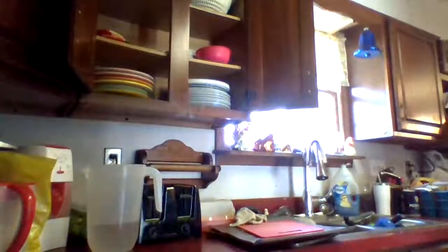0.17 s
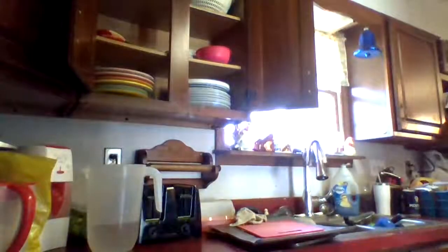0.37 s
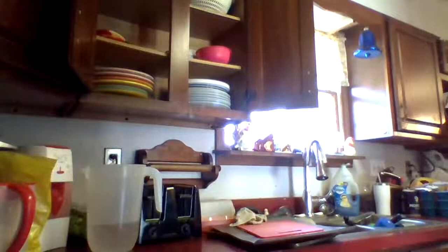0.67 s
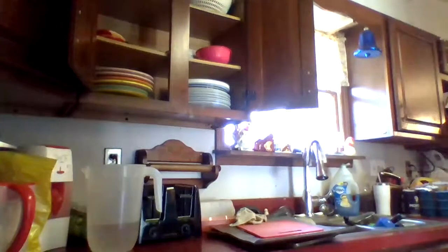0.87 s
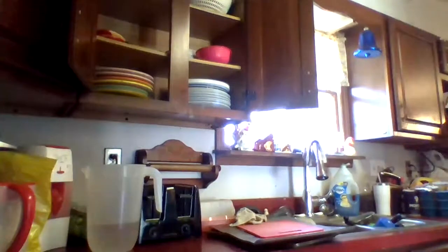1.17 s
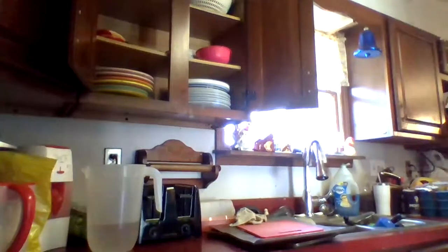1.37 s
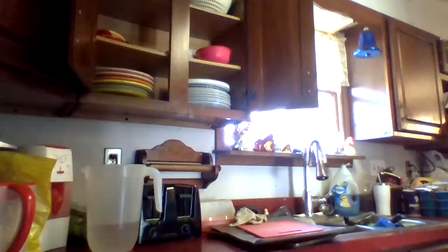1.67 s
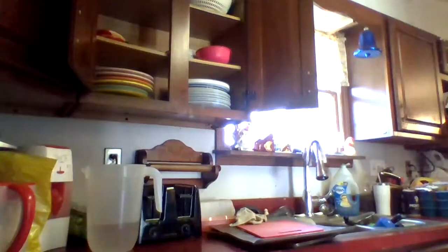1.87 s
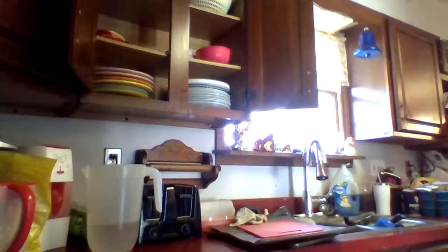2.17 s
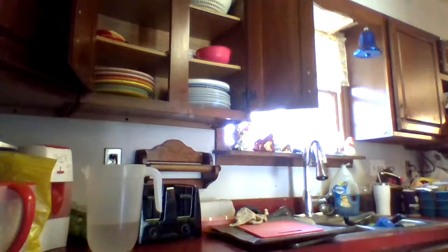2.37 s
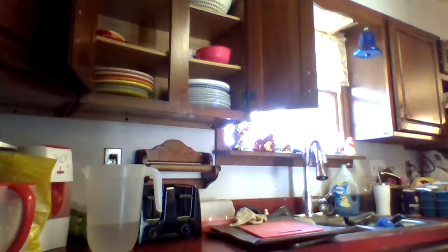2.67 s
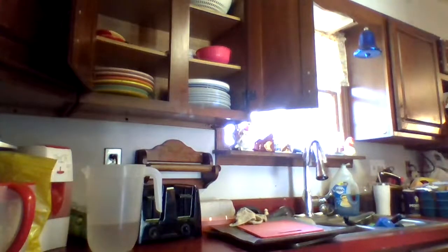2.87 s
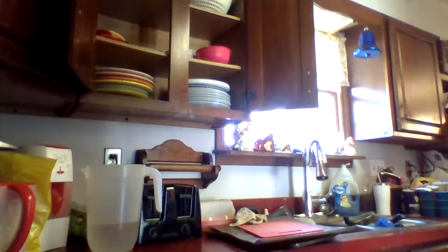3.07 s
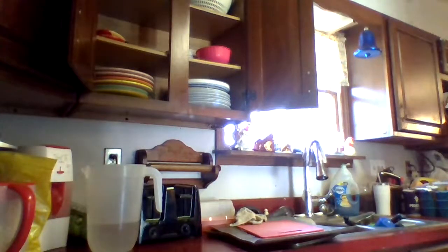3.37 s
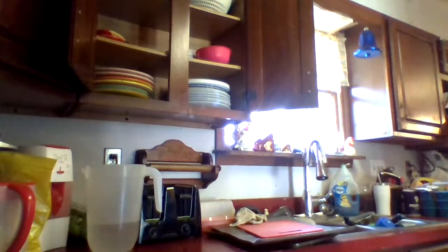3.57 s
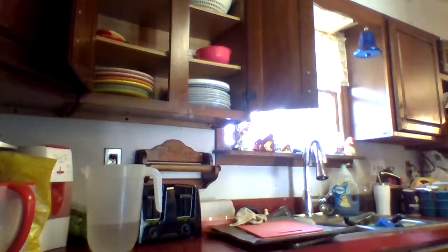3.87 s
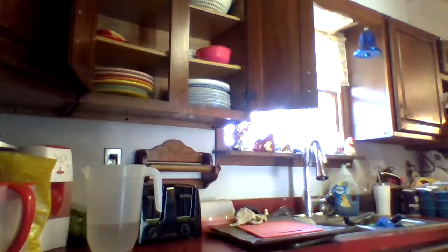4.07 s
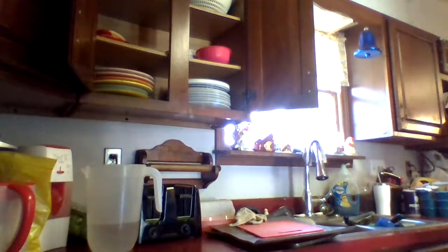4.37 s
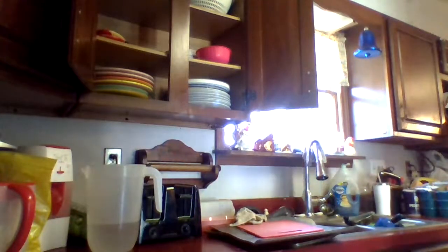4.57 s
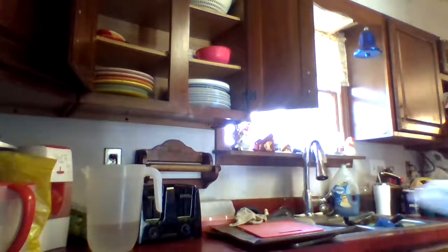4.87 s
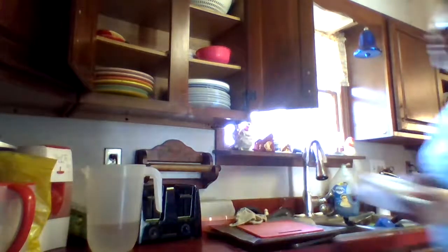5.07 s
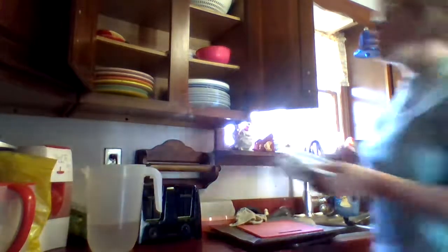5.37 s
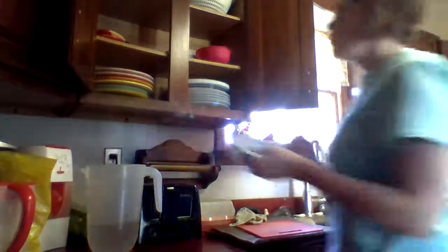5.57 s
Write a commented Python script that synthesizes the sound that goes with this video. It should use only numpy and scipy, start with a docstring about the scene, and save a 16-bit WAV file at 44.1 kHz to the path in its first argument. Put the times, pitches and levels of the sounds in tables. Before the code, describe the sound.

In a small lively kitchen, ceramic plates are lifted from a rack and gathered a few steps from the microphone. Two early clinks lead to a loud rapid clatter, then scattered lighter taps and further clashes. Grainy sliding and low footfall thuds follow, ending in a hard, distorted clack. A faint refrigerator hum and hiss lie beneath; sound is only in the left channel.

```python
"""In a small kitchen, a few steps from the microphone, ceramic plates are lifted from a rack and gathered.
Rims clash and chatter: each contact is a noise crack plus plate modes rung by a burst of tiny blows.
Glaze slides as grainy hiss and brushed rims sing single tones, over low footfall thuds,
a refrigerator's wavering tones and shaped noise for room rumble and microphone hiss.
Only the left channel carries sound; the hardest blows clip."""
import sys
import numpy as np
from scipy import signal
from scipy.fft import rfft, irfft, next_fast_len
from scipy.io import wavfile
from scipy.ndimage import map_coordinates

SR = 44100
rng = np.random.default_rng(int(sys.argv[2]) if len(sys.argv) > 2 else 0)


def transcribe(signal):
    """Save signal, clipped to [-1, 1], as a 16-bit WAV file at the path in sys.argv[1]."""
    frames = np.atleast_2d(signal).T
    limited = np.clip(frames, -1, 1)
    pcm = np.round(limited * 32767).astype(np.int16)
    wavfile.write(sys.argv[1], SR, pcm)


N = 251811  # length in samples


def amp(db):
    """Amplitude factor of a level in dB."""
    return 10 ** (np.asarray(db) / 20)


def unit(x):
    """The signal scaled to an rms of 1."""
    return x / np.sqrt(np.mean(x ** 2) + 1e-20)


def along(points, hz):
    """Values at hz, read from (f/Hz, value) points on a log frequency axis."""
    f, value = np.transpose(points)
    return np.interp(np.log(hz + 1), np.log(f + 1), value)


def wobble(rate):
    """A smooth random curve with rate knots a second."""
    knots = rng.standard_normal(int(N * rate / SR) + 4)
    return map_coordinates(knots, [np.arange(N) * rate / SR])


def noise(spectrum, size):
    """Noise whose relative level per Hz follows (f/Hz, level/dB) points."""
    hz = np.fft.rfftfreq(size, 1 / SR)
    white = rfft(rng.standard_normal(size))
    return irfft(white * amp(along(spectrum, hz)), size)


def air():
    """Room rumble and microphone hiss: steady noise whose level drifts slightly."""
    # colour of the quiet room and microphone: f/Hz, relative level per Hz/dB
    room_colour = [(15, -3), (30, -3), (60, -3.5), (80, -18), (140, -18.5), (250, -21.5), (380, -19.5),
                   (480, -27), (1000, -30.5), (2750, -41), (8000, -44), (11000, -45.5), (14000, -39.5),
                   (16500, -45)]
    level_db = -49.5 + 0.23 * wobble(0.83)
    return amp(level_db) * unit(noise(room_colour, N))


def fridge():
    """Refrigerator tones, each wavering in level while all share a slow wander in pitch."""
    # refrigerator tones, a 56.5 Hz harmonic series and a separate 380 Hz tone: f/Hz, nominal rms level/dB
    hum_tones = [(56.5, -58.5), (113, -65), (169.5, -51), (226, -63), (282.5, -70), (380, -69.5)]
    t = np.arange(N) / SR
    drift = np.cumsum(0.004 * wobble(2.7)) / SR  # s
    out = np.zeros(N)
    for hz, db in hum_tones:
        level = np.sqrt(2) * amp(db + wobble(18))
        phase = rng.uniform(0, 2 * np.pi)
        out += level * np.sin(2 * np.pi * hz * (t + drift) + phase)
    return out


def steps():
    """Footfalls felt through the counter: the floor's slow mode swells and dies."""
    # footfalls: t/s, level before the swell/dB, f/Hz, t60/s
    footfalls = [(4.365, -22.5, 27.9, 0.53), (4.431, -35, 35.6, 0.18), (4.539, -46.5, 39.84, 0.14),
                 (5, -32.5, 41.4, 0.11), (5.071, -15, 28.5, 0.15), (5.141, -32.5, 31.1, 0.64)]
    out, t = np.zeros(N + SR), np.arange(SR // 2) / SR
    swell = 1 - np.exp(-t / 0.0126)
    for s, db, hz, t60 in footfalls:
        thud = amp(db - 60 * t / t60) * np.sin(2 * np.pi * hz * t) * swell
        out[round(s * SR):][:len(t)] += thud
    return out[:N]


def room_tail():
    """A fresh kitchen echo tail of energy 1; each frequency dies at its own speed."""
    # how long the kitchen rings: f/Hz, t60/s
    kitchen_t60 = [(200, 0.16), (1000, 0.46), (4000, 0.38), (9000, 0.31), (15000, 0.2)]
    hz, t, z = signal.stft(rng.standard_normal(SR // 2), SR, nperseg=256)
    decay = amp(-60 * t / along(kitchen_t60, hz)[:, None])
    tail = signal.istft(z * decay, SR, nperseg=256)[1]
    tail = tail * (1 - np.exp(-np.arange(len(tail)) / (0.0005 * SR)))  # echoes thicken over the first walls
    return tail / np.linalg.norm(tail)


def slides():
    """Glaze on glaze: hiss, grainy where it catches, swells to a peak, fades, and echoes in the room."""
    # strokes: peak t/s, 20 dB rise/s, 20 dB fall/s, dull level/dB, bright level/dB (before the echo)
    strokes = [(.02, 0.13, .25, -62, -66), (.165, 0.054, .01, -51.5, -60.5),
               (3.956, 0.023, .03, -61.5, -87), (4.15, 0.39, 0.19, -59, -52),
               (4.873, .015, 0.092, -42.5, -67), (5.149, .25, 0.087, -58.5, -66.5),
               (5.286, .055, .01, -50.5, -55), (5.62, 0.25, .3, -61.5, -70)]
    # colour of the dull hiss: f/Hz, relative level per Hz/dB
    dull_colour = [(500, -11), (1200, -6), (2500, -7.5), (4500, -9.5), (8000, -24)]
    # colour of the bright hiss: f/Hz, relative level per Hz/dB
    bright_colour = [(2500, -24), (5000, 1.5), (8000, 0), (12000, -4.5), (16000, -9.5)]
    out, t = np.zeros(N), np.arange(N) / SR
    dull = unit(noise(dull_colour, N) * amp(2.5 * wobble(230)))
    bright = unit(noise(bright_colour, N) * amp(2.5 * wobble(230)))
    for s, rise, fall, dull_db, bright_db in strokes:
        swell = amp(-20 * np.maximum((s - t) / rise, (t - s) / fall))
        out += swell * (amp(dull_db) * dull + amp(bright_db) * bright)
    echo = signal.fftconvolve(out, room_tail())[:N]
    return out + amp(-1.0) * echo


def brushes():
    """Rims brushed so softly that one mode alone sings, swelling gently and fluttering as it fades."""
    # brushed rims: t/s, f/Hz, level before swell and flutter/dB, t60/s
    brushed = [(0.136, 3100, -49, 0.17), (.45, 1976, -51, 0.11), (.455, 3440, -53.5, 0.09),
               (.6, 1976, -60, 0.11), (.91, 1976, -58, 0.26), (.92, 3440, -65, .15),
               (.995, 2100, -55, 0.13), (4.555, 5860, -60.5, 0.22), (4.699, 2150, -60.5, 0.2),
               (5.601, 3880, -65, 0.5)]
    out, t = np.zeros(N + SR), np.arange(SR // 2) / SR
    swell = 1 - np.exp(-t / 0.0054)
    for s, hz, db, t60 in brushed:
        tone = amp(db - 60 * t / t60) * np.sin(2 * np.pi * hz * t) * swell
        out[round(s * SR):][:len(t)] += tone
    flutter = amp(3 * wobble(60))
    return out[:N] * flutter


def plate_ring(modes, grip, t):
    """The plates' modes, one a row; hand and neighbours damp them, the high ones first."""
    hz, level_db, t60 = np.transpose(modes)[:, :, None]
    chance = rng.standard_normal((3, len(modes), 1))  # for level, phase and beat rate
    own_loss_db = 60 * t / np.clip(t60, 0.02, 2)
    grip_loss_db = 60 * t * (1 + hz / 9000) / grip
    # a round plate's modes come in close pairs, so they beat
    beat = np.cos(2 * np.pi * 0.0022 * hz * chance[2] * t + chance[1])
    tone = np.sin(2 * np.pi * hz * t + 3 * chance[1]) * (1 + 0.7 * beat)
    return amp(level_db + 0.64 * chance[0] - own_loss_db - grip_loss_db) * tone


def clink(modes, knock_db, body_db, sparkle_db, ring_db, chatter, grip):
    """A burst of tiny rim contacts: a lumpy noise crack, and blows that ring the plates."""
    # where knock (two points), body, clink and sparkle (two points) sit: f/Hz
    bands = [150, 450, 1200, 4000, 11000, 16000]
    t = np.arange(SR // 6) / SR
    ring = plate_ring(modes, grip, t)
    dying = amp(-60 * t / chatter) * (1 - np.exp(-t / 0.0034))
    touches = rng.random(len(t)) < 900 / SR  # about 900 re-contacts a second
    taps = dying * rng.standard_normal(len(t)) * touches
    taps[0] = 0.8  # the first blow

    # knock is weaker at its low edge, sparkle stronger at its low edge
    band_db = [knock_db - 3.5, knock_db, body_db, 0, sparkle_db + 5.5, sparkle_db]
    knots = t[::90]
    grain = amp(2.5 * np.interp(t, knots, rng.standard_normal(len(knots))))  # the crack comes in lumps
    crack = noise(list(zip(bands, band_db)), len(t)) * dying * grain

    tones, blows = rfft(ring, 2 ** 13), rfft(taps, 2 ** 13)
    # each mode keeps its own energy, however the blows happen to fall
    share = np.linalg.norm(tones, axis=1) / np.linalg.norm(tones * blows, axis=1)
    rung = irfft(share @ tones * blows)[:len(t)]
    rung = rung * (1 - np.exp(-t / 0.00062))  # soft onset
    return crack + amp(ring_db) * rung


def plates():
    """Every rim contact, direct and answered by the kitchen; the pair that touches sets its modes."""
    # contacts: t/s, level/dB (gain on crack and ring), ring gain over crack/dB, chatter t60/s
    contacts = [(.1745, -17, -11, 0.085), (.2079, -21.5, -1, 0.067), (0.6293, -55, -11.5, .03),
                (.9994, -52.5, -2, .041), (1.0355, -12, -6.5, .029), (1.3914, -15.5, 6, 0.24),
                (1.3987, -6, -4, 0.062), (1.4194, -15.5, -30, .059), (1.4676, -2, -5.5, 0.063),
                (1.4944, -10, -5.5, 0.06), (1.5144, -10.5, -13, 0.047), (1.5392, -19, -28, 0.034),
                (1.6422, -12.5, -11, 0.052), (1.6687, -23.5, -26, 0.09), (1.7391, -33.5, -7, 0.055),
                (1.8856, -29.5, -1.5, 0.051), (1.92, -34.5, -4, 0.069), (1.9445, -27.5, -6.5, 0.0355),
                (2.0038, -32, -4.5, 0.085), (2.0921, -34, -12, .068), (2.1294, -37, -12.5, 0.057),
                (2.1814, -30, -14, 0.06), (2.2628, -21.5, 8, 0.053), (2.4833, -47, -6, 0.067),
                (2.6105, -10.5, -15, 0.1), (2.6394, -15.5, -15.5, 0.052), (2.7324, -30, -9.5, 0.044),
                (2.7874, -15.5, -3, 0.074), (2.8194, -18, -7.5, .06), (2.843, -23, -6, .06),
                (2.9317, -11, 3.5, 0.031), (3.034, -36, -14, .04), (3.2884, -59, 2.5, 0.033),
                (3.4526, -32.5, -9.5, 0.0376), (3.5094, -35.5, 6, 0.088), (3.5504, -22.5, -7, 0.055),
                (3.5568, -14, -7.5, 0.0297), (3.8841, -33.5, -2, 0.049), (3.9504, -43.5, -19, 0.096),
                (4.0003, -45, -17, 0.064), (4.2532, -11.5, -12, 0.07), (4.336, -12.5, -18.5, 0.0384),
                (4.7788, -29, -7.5, 0.081), (5.2906, -1.5, -15, 0.13), (5.2952, -12, 16, .037),
                (5.2996, -21, 16, 0.028), (5.305, -16, 10, .025), (5.3235, -20.5, -13, 0.067)]
    # which plates touch: from t/s, number of the pair
    touching = [(0, 15), (.4, 0), (1.38, 1), (1.63, 2), (1.87, 11), (2.08, 3), (2.17, 11), (2.25, 4),
                (2.59, 5), (2.78, 6), (2.92, 7), (3.4, 12), (3.5, 13), (3.545, 8), (3.8, 16), (4.2, 9),
                (4.75, 14), (5.2, 10)]
    # modes of each pair: f/Hz, level/dB (nominal), t60/s (held within 0.02-2 s, before the grip)
    pair_modes = [
        [(1975, -12, 0.58), (2390, -16.5, 0.27), (3380, -8.5, 0.47), (5180, -19.5, 5.0), (6000, -1, 0.31),
         (6767, -15, 0.73), (6960, -18, 0.29), (7670, -12.5, 0.41), (8393, -17, 0.33), (9300, -16, 0.26),
         (10060, -22.5, 0.18), (12190, -25, 0.26), (12890, -29, 0.78), (14300, -29.5, 0.28)],
        [(1267, -15.5, 0.2), (2030, -15, 0.48), (3140, -9, 0.2), (3460, -8, 0.7), (4266, -10, 0.6),
         (4880, -17.5, 2.7), (5520, -11, 0.25), (5590, -15.5, 0.88), (5980, -10.5, 1.5), (6726, -6.5, 1.1),
         (6360, -9, 1.6), (6865, -5, 1.4), (8250, -9, 0.78), (9320, -18.5, 5.0), (9300, -24.5, 0.74),
         (9570, -11, 0.8), (10100, -19, 0.53), (10770, -13, 0.67), (13150, -6.5, 0.33), (12000, -12.5, 0.45),
         (13350, -6, 0.87), (12160, -17.5, 0.5)],
        [(1070, -7, 0.81), (2060, -5, 0.26), (3100, -14.5, 0.097), (3610, -4, 0.21), (4250, -14, 0.23),
         (6660, -4, 0.1), (7940, -17, 0.17), (8301, -10, 0.28), (8950, -8.5, 0.38), (10730, -28.5, 0.29),
         (12500, -37, 0.24), (12900, -11, 0.24)],
        [(2450, 6, 0.037), (3520, -2.5, 0.09), (4960, -9.5, 5.0), (5760, -5, 5.0), (7460, -2.5, 0.79),
         (8600, 0.5, 0.51), (9760, 2.5, 0.22), (11000, -2, 0.39), (11500, -19, 0.76), (13410, -6.5, 5.0),
         (14100, -7, 0.39), (15460, -16.5, 5.0)],
        [(1190, -18.5, 0.34), (2003, -18, 0.44), (2600, -16, 0.35), (3516, -7, 0.53), (4320, -12.5, 0.19),
         (4840, -9, 0.84), (5510, -8, 0.65), (6505, -8.5, 0.26), (6880, -5.5, 0.42), (7970, -17, 0.087),
         (8650, -19, 0.49), (9690, -19.5, 0.228), (10670, -22, 0.16), (14840, -45, 0.37)],
        [(1962, -4, 5.0), (3984, -5.5, 0.15), (3194, 0, 0.35), (3445, -5, 0.3), (5693, 1.5, 0.27),
         (6750, -2, 0.17), (7100, -6.5, 0.21), (7800, -5.5, 0.3), (8350, -8.5, 1.4), (9440, -12, 0.24),
         (9510, -2, 0.14), (9870, -13, 0.24), (10900, -6, 0.24), (11450, -25, 0.2), (11900, -5.5, 0.17),
         (13290, 0, 0.25), (660, -20.5, 0.2), (1118, -6, 0.076)],
        [(1290, -9.5, 0.058), (1950, -5.5, 0.36), (2089, -9, 0.76), (2485, -13.5, 0.56), (3430, -9, 0.49),
         (4855, -7.5, 0.22), (6200, -10, 0.58), (6784, -3, 0.2), (7100, -15.5, 0.34), (8400, -8, 0.23),
         (10300, -5, 0.32), (13000, -22.5, 0.47), (14080, -26, 0.53), (14820, -14, 0.33)],
        [(1043, -16.5, 2.4), (2334, -21, 0.6), (3480, -16, 0.56), (4250, -17, 0.34), (5500, -43, 0.42),
         (6040, -23, 0.073), (6780, -15.5, 0.37), (9630, -26.5, 0.86), (11660, -23.5, 0.24), (13240, -18, 0.18),
         (13770, -33.5, 0.17)],
        [(2055, -6, 0.13), (2540, -10.5, 0.3), (2940, -9, 0.058), (3580, -14.5, 0.29), (4910, -9.5, 0.29),
         (5570, 4, 0.14), (5600, 1, 0.047), (6330, -10, 0.25), (6800, -11.5, 0.29), (7580, -13.5, 0.26),
         (7800, -28.5, 0.38), (8800, -12.5, 0.2), (10800, -25.5, 0.3), (12000, -32.5, 0.24),
         (13600, -26.5, 0.2), (306, -23.5, 0.2), (580, -31, 0.21)],
        [(1198, -10.5, 3.1), (2184, -11, 0.34), (2997, -8, 0.41), (3440, -19.5, 5.0), (4220, -8.5, 0.39),
         (4790, -25, 5.0), (6240, -17, 1.3), (5860, -25, 1.3), (6070, -24, 0.46), (7000, -17, 0.23),
         (8900, -25.5, 0.39), (10750, -10.5, 0.25), (11460, -49, 5.0), (13700, -27.5, 0.38)],
        [(774.6, -23.5, 0.31), (1236, -8.5, 0.074), (2593, -6, 0.15), (2765, -25.5, 0.34), (3020, -18, 0.21),
         (3933, -5.5, 0.02), (4277, -15.5, 0.085), (4747, -13.5, 0.1), (1391, -16, 0.13), (5450, -13, 0.1),
         (7090, -21.5, 0.087), (6720, -34.5, 0.85), (7130, -14.5, 0.14), (8200, -24.5, 0.15),
         (9160, -20.5, 0.18), (10800, -30.5, 0.23), (12000, -32, 0.096), (11740, -26, 0.14)],
        [(1090, -9, 5.0), (1560, -32.5, 0.15), (2169, -3.5, 0.095), (3393, -6.5, 0.5), (4560, -33, 5.0),
         (6160, -38.5, 5.0), (6930, -12.5, 0.14), (9800, -22, 0.24), (10960, -30.5, 5.0), (15500, -24, 1.2)],
        [(1140, 0.5, 0.067), (2020, -7.5, 0.053), (3400, -8, 0.78), (7350, -5, 0.03), (7860, -2.5, 0.12),
         (9430, -1, 0.1)],
        [(1013, -16, 0.22), (2210, -9, 0.015), (3596, -7, 0.027), (4770, -12.5, 0.16), (6089, -36, 0.096),
         (6934, -30, 0.027), (8565, -39, 0.096)],
        [(1155, -3, 5.0), (1876, -11, 0.064), (3440, -4, 0.21), (4320, -8, 0.13), (5480, -9, 0.19),
         (6730, -21.5, 0.3), (6870, -10, 0.13), (7650, -12, 0.19), (9600, -22.5, 0.061), (13340, -12, 0.13)],
        [(1130, -23.5, 2.1), (2060, -13, 0.18), (3443, -4.5, 0.28), (4160, -15, 0.24), (4850, -7.5, 0.32),
         (5920, -12, 0.3), (6783, -12.5, 0.67), (7120, -13, 0.22), (7460, -10.5, 0.18), (8650, -9, 0.2),
         (9600, -8, 0.15), (10100, -15.5, 0.19), (10830, -12, 0.23), (13360, -32.5, 0.35), (332, -19.5, 0.23),
         (743, -17, 0.1)],
        [(1370, -9, 0.1), (2510, -12.5, 0.6), (2760, -3, 0.06), (4530, -15, 0.13), (6400, -23, 5.0),
         (7946, -28.5, 0.39)],
    ]
    # how each pair is held and its distance: knock/dB, body/dB, sparkle/dB, grip t60/s (low modes), echo/dB
    holds = [(1, 3.5, -7, 0.098, 1), (-16, 2.5, -8.5, 0.098, 0.5), (-12.5, 2.5, -10, 0.136, -1.5),
             (-9, -1, -9.5, 0.046, 4), (-13, 3, -10.5, 0.033, -1.5), (-11, 4.5, -1.5, 0.124, -2.5),
             (-25, 1, -8.5, 0.095, 1), (-11, 4.5, -5.5, 0.048, 1.5), (5, -5.5, -11.5, 0.061, 1),
             (-17.5, -2, -17, 0.15, -3), (-20, -5, -14.5, 0.062, -10.5), (-8, 1.5, -9, 0.045, 1),
             (-11, -8, -7, 0.056, 0.5), (0, -3, -18, 0.1, -2), (-13, 2.5, -10, 0.092, -8.5),
             (-4.5, 3.5, -14.5, 0.091, -4), (-2.5, 8, -26.5, 0.043, -6.5)]
    out = np.zeros(N + 2 * SR)
    starts, pair = np.transpose(touching)
    for s, level_db, ring_db, chatter in contacts:
        k = int(pair[np.searchsorted(starts, s) - 1])
        knock_db, body_db, sparkle_db, grip, echo_db = holds[k]
        near = clink(pair_modes[k], knock_db, body_db, sparkle_db, ring_db, chatter, grip)
        heard = amp(echo_db) * signal.fftconvolve(near, room_tail())
        heard[:len(near)] += near
        out[round(s * SR):][:len(heard)] += amp(level_db) * heard
    return out[:N]


def scene():
    """All layers in the left channel, silence in the right."""
    left = air() + fridge() + steps() + slides() + brushes() + plates()
    return np.array([left, np.zeros(N)])


def record(dry):
    """The converter clips with a slightly rounded knee at full scale, then a band limit cuts the top."""
    top_hz = 16050
    clipped = dry / (1 + np.abs(dry) ** 12) ** (1 / 12)
    size = next_fast_len(N + 8192)
    kept = np.fft.rfftfreq(size, 1 / SR) < top_hz
    return irfft(rfft(clipped, size) * kept, size)[:, :N]


dry = scene()
out = record(dry)
transcribe(out)
```